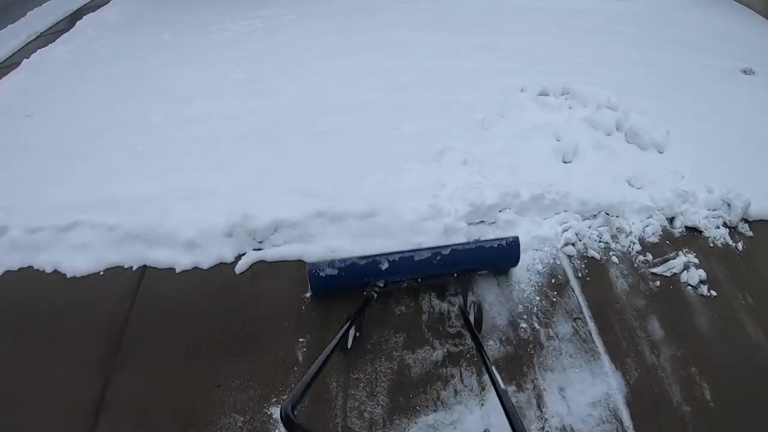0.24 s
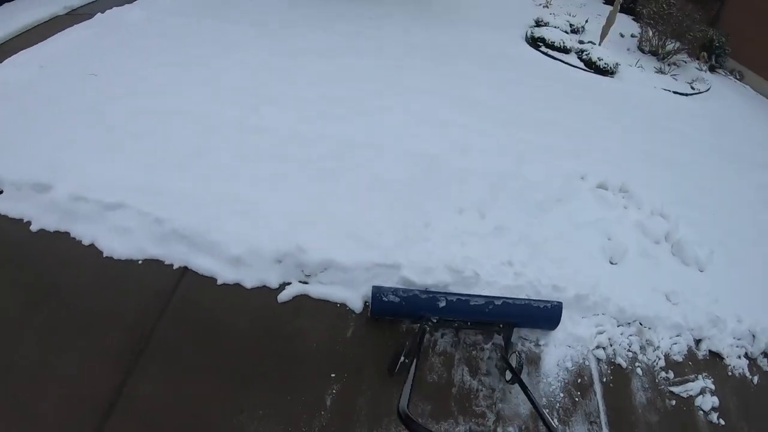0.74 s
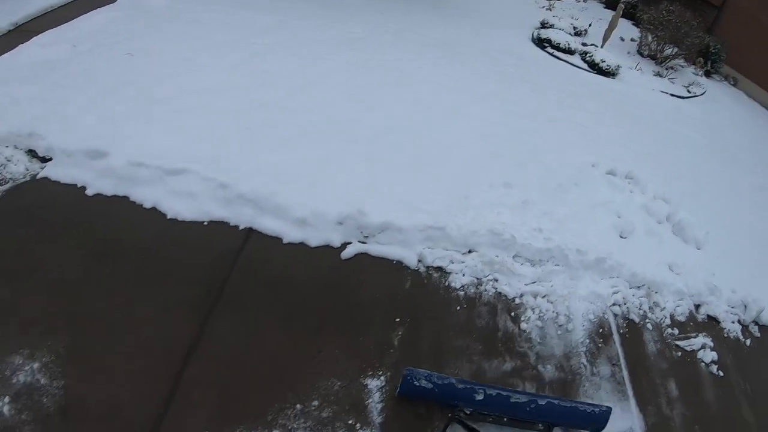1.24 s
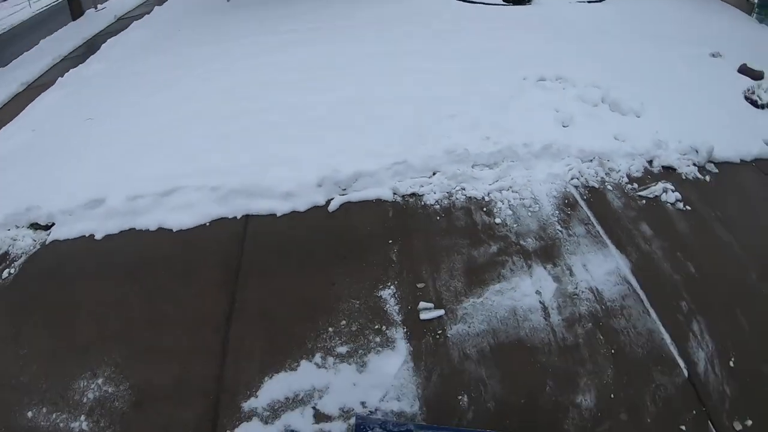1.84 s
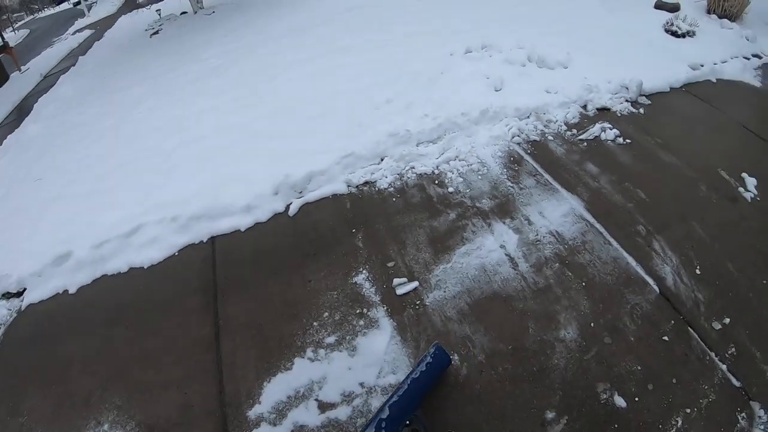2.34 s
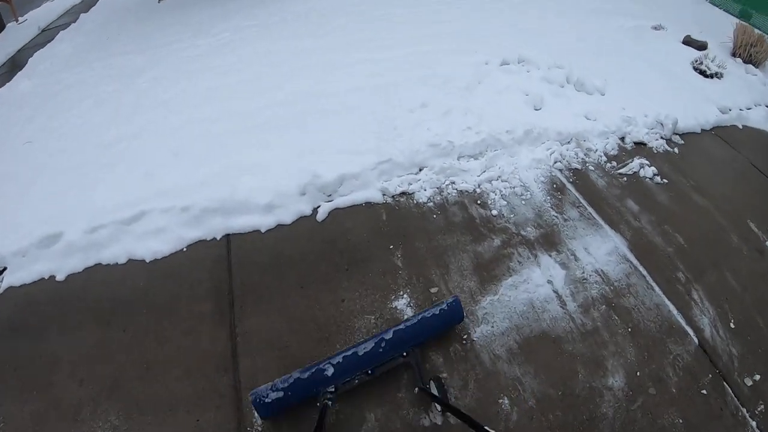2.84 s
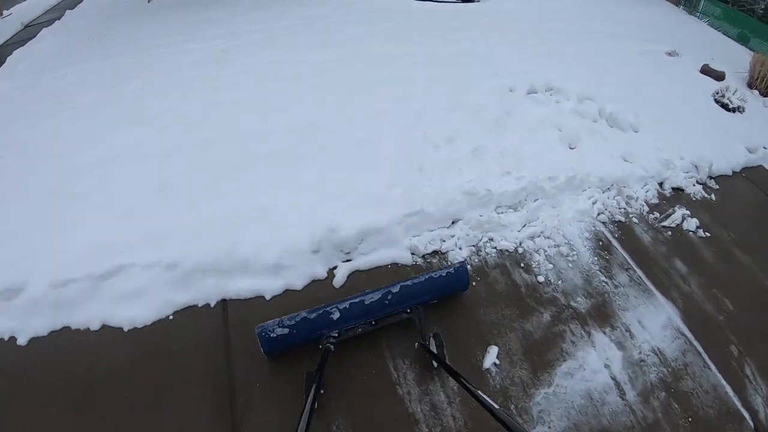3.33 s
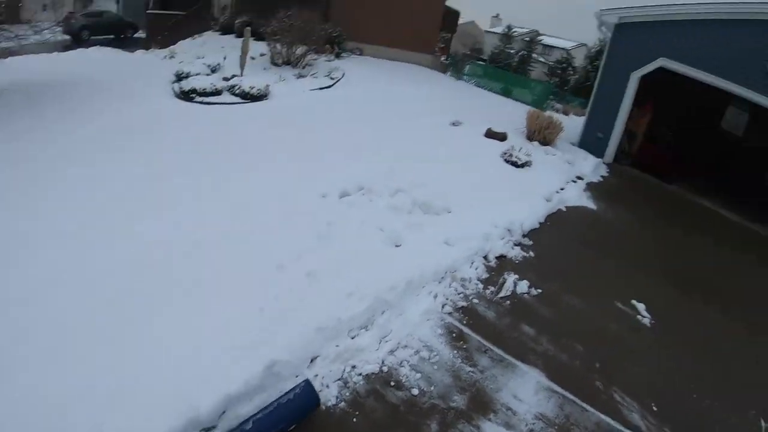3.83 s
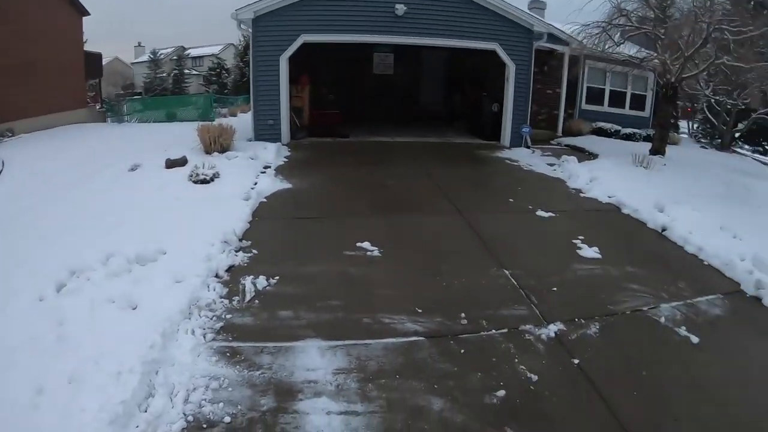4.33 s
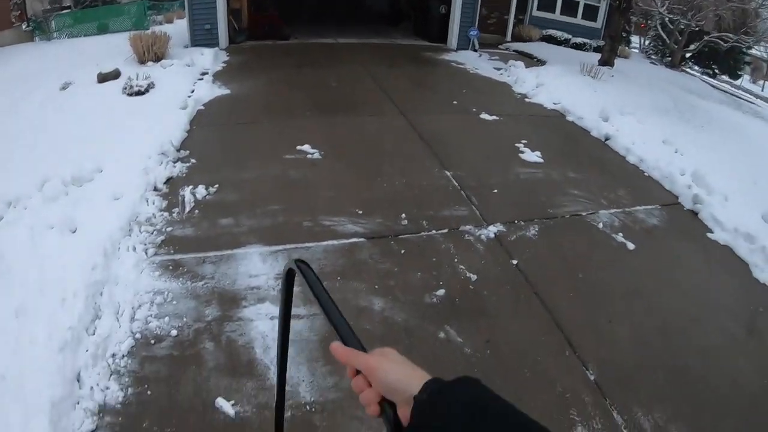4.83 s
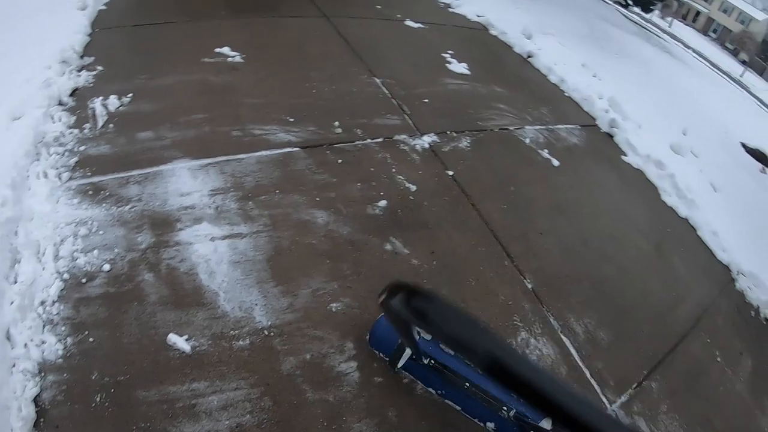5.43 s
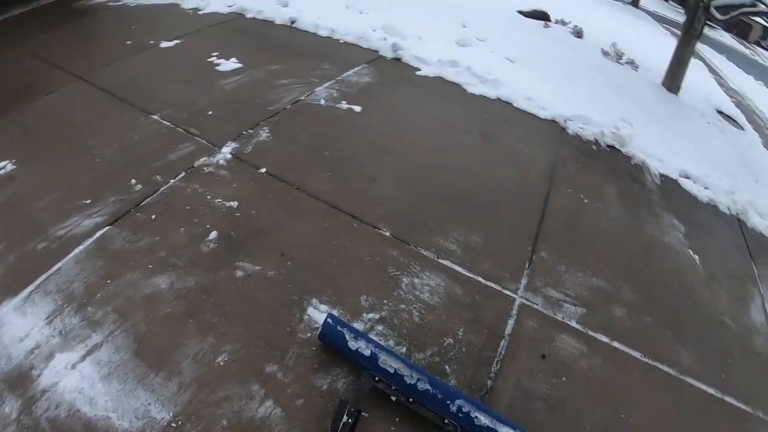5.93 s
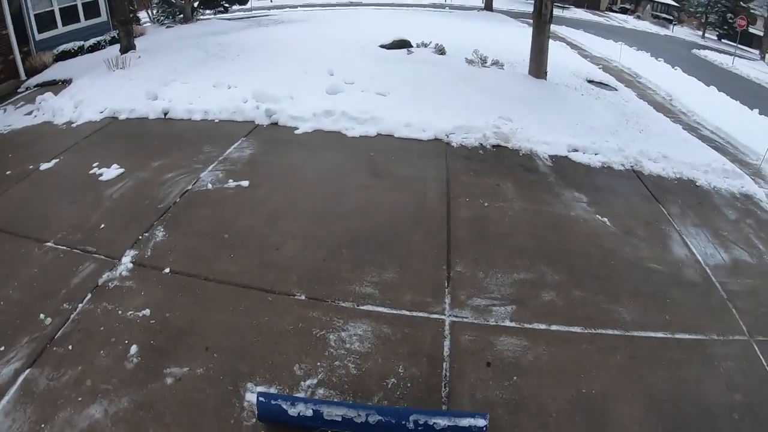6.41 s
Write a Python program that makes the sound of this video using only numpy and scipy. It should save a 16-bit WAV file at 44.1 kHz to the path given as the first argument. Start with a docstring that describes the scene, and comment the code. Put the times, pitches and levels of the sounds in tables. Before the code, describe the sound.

A plastic snow pusher works on a concrete driveway, heard in stereo from the worker's head, mostly right of centre. From 0 to 0.45 s a harsh, juddering rasp pushes forward, ending in hollow knocks and dry snaps. From 0.5 to 1.65 s the blade skips in short gritty skids with ticks and soft bumps. A long stroke starts faintly near 1.7 s, grows at 2.2 and runs as a sandy, hissing scrape until 3.55 s, stopping in a crack and a flurry of snaps. Skids and a strong double knock at 4.0 s fade into light scraping; small rough squeaks stutter from 4.8 to 5.2 s. A faint scuff at 5.6, hard knocks with slight steel clinks at 5.8-6.0, then a quiet skim with a brief hollow tone at 6.35 swells into a rasp to the end. Soft wind and quiet steady outdoor air lie beneath.

```python
"""Snow pusher on a concrete driveway

A plastic blade on a steel frame is shoved and dragged over concrete, heard in stereo from the worker's head.
Grit noise makes the rasp and hiss, random stick-slip shakes the blade's modes, and narrow noise makes it squeak.
Knocks, ticks and soft bumps ring the plastic; steel fittings clink, and house fronts return a faint tail.
Light wind noise touches the microphone over a quiet, steady outdoor background."""
import sys
import numpy as np
from scipy import signal
from scipy.fft import rfft, irfft
from scipy.io import wavfile

SR = 44100
rng = np.random.default_rng(int(sys.argv[2]) if len(sys.argv) > 2 else 0)


def unload_wav(signal):
    """Save mono or channel-first audio to the path in sys.argv[1] as 16-bit WAV at rate SR, clipped to [-1, 1]."""
    wavfile.write(
        sys.argv[1],
        SR,
        np.round(np.clip(np.atleast_2d(signal).T, -1, 1) * 32767).astype(np.int16),
    )


N = 294147

# The four long strokes of the edge, each: (time [s], rasp [dB], judder [dB], fine hiss [dB])
FIRST_PUSH = [(0.0, -23, -21, -30), (0.024, -37.5, -44, -34), (0.032, -28.5, -32.5, -29.5),
              (0.162, -31, -34, -29.5), (0.316, -27, -27, -24.5), (0.455, -27, -22.5, -27.5)]
LONG_STROKE = [(1.67, -39, -39, -39), (1.792, -37.5, -38.5, -42.5), (2.228, -27.5, -42, -31.5),
               (2.35, -32, -42.5, -31.5), (2.754, -30, -35, -29), (3.158, -32, -38.5, -30),
               (3.555, -29, -27, -27), (3.58, -45, -28, -35)]
TURN = [(4.45, -45, -50, -58), (4.522, -39, -42, -46), (4.668, -39.5, -40, -44), (4.762, -43, -46.5, -48),
        (4.924, -45, -57, -42.5), (5.204, -36.5, -38.5, -32), (5.275, -37, -38.5, -33)]
LAST_PUSH = [(6.08, -43.5, -56, -52), (6.212, -55, -72, -67), (6.388, -44, -45.5, -43.5),
             (6.67, -34, -37, -31)]
# Share of fine sizzle as the lightly loaded edge skims: (time [s], share [0-1])
SKIM = [(2.2, 0.06), (2.65, 0.3), (3.0, 0), (3.6, 0.03), (4.1, 1), (6.1, 0.74), (6.67, 0.18)]
# Broad ring of the edge, moving with its speed and angle: (time [s], centre [Hz])
EDGE_RING = [(0.1, 3500), (0.39, 3093), (2.03, 2200), (2.27, 2503), (2.4, 4990), (2.7, 6070), (2.92, 2608),
             (3.3, 4077), (3.56, 3300), (6.4, 5300)]
# Colours of the scrape, each: (frequency [Hz], relative level [dB per Hz])
RASP_COLOUR = [(300, -24), (650, 9), (850, -3.5), (1050, 4.5), (1350, 5.5), (1800, 3.5), (2400, 5.5),
               (3300, 0.5), (4300, -11), (9000, -50)]
HISS_COLOUR = [(2000, -12), (3500, 6.5), (4500, 5.5), (5600, 3), (7600, -5.5), (8800, -7), (9600, -14),
               (10600, -22.5), (11900, -23.5), (14000, -30), (15500, -71)]
SIZZLE_COLOUR = [(2500, 8), (4500, 13.5), (7500, 11.5), (8900, 4.5), (9700, -6.5), (10700, -34),
                 (12000, -11), (15500, -46)]
COARSE_COLOUR = [(400, -6.5), (1000, -2), (1500, 1.5), (2700, -7), (3600, -7.5), (5500, -10.5), (8000, -23),
                 (11000, -38)]
# A loaded edge runs more evenly, so its friction spreads less
PUSH_SPREAD_DB, TURN_SPREAD_DB, SKID_SPREAD_DB = 1.23, 1.5, 2.5
TURN_LIFT_QUICKNESS = 1.9   # the blade is lifted clear: its release is this many times faster
COARSE_DB, EDGE_RING_DB = -15, -5


def scrape(catch_rate_hz=62):
    """One uneven friction drives rasp, hiss, judder, coarse crunch and the ring of the edge."""
    grip = np.minimum(drift(catch_rate_hz), 1)   # the edge slips before it can grip harder

    def friction_power(spread_db):
        return from_db(spread_db * grip - spread_db ** 2 / 10) ** 2

    pushes = stroke(FIRST_PUSH) + stroke(LONG_STROKE) + stroke(LAST_PUSH)
    pushes = pushes * friction_power(PUSH_SPREAD_DB)
    turn = stroke(TURN, TURN_LIFT_QUICKNESS) * friction_power(TURN_SPREAD_DB)
    skidding = skids() * friction_power(SKID_SPREAD_DB)
    rasp_gain, judder_gain, hiss_gain = np.sqrt(pushes + turn + skidding)

    rasp = rasp_gain * grit(RASP_COLOUR, per_s=6000, size_db=0.0)
    skim = np.clip(in_time(SKIM)[0], 0, 1)
    hiss = np.sqrt(1 - skim) * grit(HISS_COLOUR, per_s=12000, size_db=0.5)
    sizzle = np.sqrt(skim) * grit(SIZZLE_COLOUR, per_s=12000, size_db=3.0)
    fine = hiss_gain * (hiss + sizzle)
    edge_noise = resonance(in_time(EDGE_RING)[0], width_hz=1500)
    edge = from_db(EDGE_RING_DB) * np.sqrt(pushes[2]) * edge_noise

    # coarse grains crunch most in the skids
    coarse_gain = from_db(COARSE_DB) * np.sqrt(skidding[0] + .5 * pushes[0])
    coarse = coarse_gain * grit(COARSE_COLOUR, per_s=450, size_db=2.0)
    body = judder_gain * soften(judder(slips_per_s=1100, size_db=2.0), corner_hz=3020)
    return ground_bounce(rasp + fine + edge) + coarse + body + hollow()


STROKE_RISE_S = 0.02


def stroke(curve, quickness=1):
    """Power of rasp, judder and hiss in a long stroke, following the worker's effort."""
    start_s, end_s = curve[0][0] - STROKE_RISE_S, curve[-1][0]
    touch = contact(start_s, STROKE_RISE_S, end_s - start_s, 0, quickness)
    return (from_db(in_time(curve)) * touch) ** 2


# Brief skips and skids of the blade:
# (start time [s], rise [s], length [s], rasp level [dB], judder level [dB], hiss level [dB])
SKIDS = [(0.469, 0.014, 0.081, -36.5, -28, -47), (0.565, 0.009, 0.25, -47, -37, -68),
         (0.807, 0.091, 0.087, -29.5, -29, -33.5), (0.891, 0.015, 0.087, -43.5, -54, -40.5),
         (0.989, 0.023, 0.058, -39, -31.5, -36.5), (1.048, 0.054, 0.092, -29.5, -30, -31),
         (1.183, 0.017, 0.097, -32, -30.5, -33), (1.3, 0.0046, 0.058, -31, -31.5, -34),
         (1.407, 0.0068, 0.037, -32, -28, -36.5), (1.476, 0.024, 0.022, -28.5, -29.5, -30.5),
         (1.525, 0.0068, 0.082, -30, -30.5, -35), (1.623, 0.0039, 0.033, -31.5, -32.5, -36),
         (3.582, 0.017, 0.018, -27.5, -27, -31), (3.623, 0.01, 0.23, -40.5, -32.5, -47),
         (3.789, 0.011, 0.023, -27, -28, -31), (3.827, 0.011, 0.055, -34, -29, -32.5),
         (3.881, 0.043, 0.097, -33.5, -38.5, -38.5), (4.002, 0.028, 0.09, -31.5, -34, -35),
         (4.11, 0.019, 0.53, -36.5, -36, -43), (5.82, 0.022, 0.11, -24.5, -23, -28),
         (5.937, 0.01, 0.11, -32, -31, -35)]
SKID_SAG_DB_PER_S = 42   # a skid loses speed as it goes


def skids():
    """Power of rasp, judder and hiss in the short skids: each bites, slows and lifts off."""
    power = 0
    for start_s, rise_s, length_s, *levels_db in SKIDS:
        touch = contact(start_s, rise_s, length_s, SKID_SAG_DB_PER_S)
        power = power + (from_db(levels_db)[:, None] * touch) ** 2
    return power


# the edge falls silent at once, the blade shakes on
EDGE_RELEASE_DB_PER_S, JUDDER_RELEASE_DB_PER_S = 524, 236


def contact(start_s, rise_s, length_s, sag_db_per_s, quickness=1):
    """Envelopes of rasp, judder and hiss for one touch of the edge on the ground."""
    edge, blade = [swell(start_s, rise_s, length_s, sag_db_per_s, quickness * release)
                   for release in (EDGE_RELEASE_DB_PER_S, JUDDER_RELEASE_DB_PER_S)]
    return np.array([edge, blade, edge])


# Low modes of the blade: (frequency [Hz], level [dB], nominal t60 [s])
BLADE_MODES = [(118.5, -24.5, 0.45), (143, -8.5, 0.089), (205, 1, 0.049), (291.4, -2.5, 0.066),
               (372, -3, 0.042), (480, -4, 0.044), (616, 0, 0.018), (827, -3.5, 0.015)]


def judder(slips_per_s, size_db):
    """The edge sticks and slips at random, shaking the blade's low modes; rms 1 in the middle."""
    slips = (rng.random(N) < slips_per_s / SR) * from_db(size_db * np.minimum(rng.exponential(1, N), 3))

    def shake():
        # the loaded blade rings for only 0.63 of the nominal time
        return rms_one(sum(from_db(db) * ring(slips * rng.standard_normal(N), hz, 0.63 * t60)
                           for hz, db, t60 in BLADE_MODES))

    return stereo(shake(), shake())


# The gap under the tilted blade sings: (start time [s], length [s], starting pitch [Hz], level [dB])
HOLLOW = [(6.331, 0.12, 809, -43.5)]
HOLLOW_SAG_HZ_PER_S, HOLLOW_RISE_S, HOLLOW_RELEASE_DB_PER_S = 220, 0.012, 309


def hollow(width_hz=60):
    """The gap under the tilted blade sings as narrow noise, its pitch falling as the angle changes."""
    t, pitch, level = np.arange(N) / SR, np.zeros(N), np.zeros(N)
    for start_s, length_s, hz, db in HOLLOW:
        pitch = np.where(t < start_s, pitch, hz - HOLLOW_SAG_HZ_PER_S * (t - start_s))
        level += from_db(db) * swell(start_s, HOLLOW_RISE_S, length_s, 0, HOLLOW_RELEASE_DB_PER_S)
    return level * resonance(pitch, width_hz)


# Bounce off the concrete as the blade tilts: (time [s], delay [ms], strength [0-1])
BOUNCE = [(3.5, 0.65, 0.16), (4.6, 0.78, 0), (4.9, 1.14, 0.4), (5.27, 1.06, 0.28), (6.67, 1.33, 0.13)]


def ground_bounce(x, wander_ms=0.248, scatter=0.16, count=3):
    """Reflections off the ground and the worker's body sweep combs through the scrape as things move."""
    delay_ms, strength = in_time(BOUNCE)
    n = np.arange(N)

    def late(ms):
        return np.array([np.interp(n - ms * SR / 1000, n, side) for side in x])

    body = sum(late(2.3 + 1.4 * k + wander_ms * drift(1.285)) for k in range(count))
    total = x + strength * late(delay_ms) + scatter * body
    return total / np.sqrt(1 + strength ** 2 + count * scatter ** 2)


# Blade strikes the ground:
# (time [s], crack level [dB], shell clatter level [dB], thump level [dB], sizzle level [dB])
KNOCKS = [(0.0329, -25.5, -52, -46, -31), (0.386, -23, -51, -22, -48), (0.44, -20.5, -43, -18, -41),
          (0.4827, -50, -49, -16.5, -30), (0.513, -29, -51, -36, -31.5), (0.58, -37, -62, -60, -36),
          (0.757, -28.5, -46.5, -21.5, -32), (1.012, -29.5, -54, -43, -31.5), (1.196, -30, -53, -34, -38),
          (1.4742, -26, -46, -39, -31.5), (3.465, -29, -50, -18.5, -34.5), (3.563, -20.5, -48, -42, -29),
          (3.622, -33, -64, -53, -31.5), (3.843, -22, -41.5, -31, -37), (3.9984, -25, -39.5, -22.5, -22.5),
          (4.0163, -18.5, -38, -20.5, -21.5), (4.098, -26.5, -42.5, -25, -30.5),
          (5.817, -18, -39, -18, -24), (5.864, -22.5, -42, -14.5, -35), (5.8848, -35, -44.5, -23.5, -25),
          (6, -21.5, -43, -35, -24.5)]


def knocks():
    """A blow thumps the blade; its edge chatters on the concrete, ringing the shell's middle modes."""
    s, crack_db, clatter_db, thump_db, sizzle_db = np.transpose(KNOCKS)
    crack = bursts(s, crack_db, t60=0.092) * grit(RASP_COLOUR, per_s=5000, size_db=4.0)
    sizzle = bursts(s, sizzle_db, t60=0.098) * grit(SIZZLE_COLOUR, per_s=20000, size_db=10.5)
    clatter = rung(bursts(s, clatter_db, t60=0.075), BLADE_MODES[3:] + SHELL_MODES[:1])

    thump = soften(strike(s, thump_db, BLADE_MODES, scatter_db=0.5), corner_hz=3500)
    wobble = soften(rung(bursts(s, thump_db - 21.5, t60=0.059), BLADE_MODES), corner_hz=203)
    low = high_pass(thump + wobble, 70)   # an open shell radiates no deep bass
    return plastic(crack + sizzle) + clatter + low


def plastic(x, t60=0.01, ring_db=-0.5):
    """The shell's many close modes ring on briefly after every grain, as a short noise tail."""
    age = np.arange(SR // 16) / SR
    tail = rng.standard_normal(len(age)) * np.exp(-np.log(1000) * age / t60) * (age > .002)
    response = from_db(ring_db) * tail / np.linalg.norm(tail) + (age == 0)
    return signal.oaconvolve(x, response[None] / np.linalg.norm(response), axes=1)[:, :N]


# The blade catches and snaps free: (time [s], snap level [dB], shell ring level [dB])
TICKS = [(0.494, -21, -28), (0.558, -23, -27), (0.5935, -19, -27), (0.6515, -33, -35), (0.6724, -38, -35),
         (0.748, -19, -27.5), (1.177, -21, -30), (1.398, -27, -38), (3.5725, -18, -20), (3.605, -19, -28),
         (3.6617, -23, -27), (3.6869, -19, -27), (3.714, -31, -33), (3.7272, -23, -40), (3.749, -30, -32.5),
         (4.193, -24.5, -48), (4.369, -23, -33), (5.942, -20, -25), (5.961, -18.5, -28)]
# Modes of the plastic shell: (frequency [Hz], level [dB], t60 [s])
SHELL_MODES = [(1240, -7, 0.022), (2310, 0.5, 0.016), (3170, -12, 0.028), (3430, -2.5, 0.033)]
# Colour of a light touch of dry plastic: (frequency [Hz], relative level [dB per Hz])
DRY_PLASTIC = [(500, -12.5), (1500, 4), (2700, 4), (5500, -9), (8000, -10), (11000, -34)]


def ticks():
    """Each release is a dry snap that rings the plastic shell and nudges the whole blade."""
    s, snap_db, ring_db = np.transpose(TICKS)
    snap_envelope = bursts(s, snap_db, t60=0.014, attack_s=0.00081)
    snap = snap_envelope * grit(DRY_PLASTIC, per_s=25000, size_db=1.5)
    shell = strike(s, ring_db, SHELL_MODES, scatter_db=6.0)
    nudge = strike(s, snap_db - 14.0, BLADE_MODES, scatter_db=5.0)
    return snap + shell + nudge


# Soft, dull bumps of the blade, some under its ticks: (time [s], level [dB])
BUMPS = [(0.536, -30), (0.595, -23.5), (1.022, -31), (1.235, -27), (1.398, -37), (1.452, -29), (1.499, -29),
         (1.648, -26.5)]


def bumps(lowest_hz=200):
    """Soft, dull bumps ring the blade's modes with the top and the bass taken off."""
    s, db = np.transpose(BUMPS)
    bump = soften(strike(s, db, BLADE_MODES, scatter_db=3.5), corner_hz=895)
    return high_pass(bump, lowest_hz)


# The skimming edge stutters in short squeaks: (time [s], level [dB])
SQUEAKS = [(4.775, -39), (4.9, -36.5), (4.961, -44), (4.987, -44), (5.02, -45), (5.111, -44), (5.21, -32)]
# Partials of the squeaks:
# (pitch at the first squeak [Hz], fall [Hz per s], level [dB], strongest time [s], spread [s])
SQUEAK_PARTIALS = [(1230, 200, 1, 5.0, 0.45), (2220, 750, 0, 4.95, 0.11), (3600, 1100, -4, 5.03, 0.11)]
SQUEAK_WIDTH_S, SQUEAL_RELEASE_DB_PER_S = 0.0051, 309


def squeaks(width_hz=150, held_db=-45.5, rise_s=0.082):
    """A rough squeal grabs again and again; its partials sink and take turns as the blade swings."""
    t, partials = np.arange(N) / SR, 0
    first_s, last_s = SQUEAKS[0][0], SQUEAKS[-1][0]

    def bell(centre_s, width_s):
        return np.exp(-np.minimum(((t - centre_s) / width_s) ** 2, 20))

    grabs = sum(from_db(db) * bell(s, SQUEAK_WIDTH_S) for s, db in SQUEAKS)
    held = from_db(held_db) * swell(first_s, rise_s, last_s - first_s, 0, SQUEAL_RELEASE_DB_PER_S)
    for hz, fall_hz_per_s, db, best_s, spread_s in SQUEAK_PARTIALS:
        tone = resonance(hz - fall_hz_per_s * (t - first_s), width_hz)
        partials = partials + from_db(db) * bell(best_s, spread_s) * tone
    return (grabs + held) * partials


# The frame's steel fittings clink: (time [s], lower ring level [dB], upper ring level [dB])
CLINKS = [(3.622, -52, -85), (4.018, -46, -60), (4.4015, -54, -50), (5.832, -48.5, -50.5),
          (5.997, -50.5, -51)]
# Modes of the steel: (frequency [Hz], level [dB], t60 [s])
STEEL_MODES = [(6620, -6, .14), (6760, -9, .22), (8230, -1, 0.06), (8770, 2, 0.045), (9055, -2, .055)]


def clinks(lower_count=2):
    """Loose steel fittings rattle high and briefly, and the frame hums on after every knock."""
    s, lower_db, upper_db = np.transpose(CLINKS)
    knock_s, *_, sizzle_db = np.transpose(KNOCKS)
    hum = bursts(knock_s, sizzle_db - 39.5, t60=0.19)
    lower = rung(bursts(s, lower_db, t60=0.016) + hum, STEEL_MODES[:lower_count])
    upper = rung(bursts(s, upper_db, t60=0.016) + hum, STEEL_MODES[lower_count:])
    return lower + upper


SCUFF_START_S, SCUFF_RISE_S, SCUFF_LENGTH_S = 5.606, 0.024, 0.11
SCUFF_DB, SCUFF_SAG_DB_PER_S = -35, 90


def scuff():
    """A short, light scuff of a boot on the concrete."""
    envelope = swell(SCUFF_START_S, SCUFF_RISE_S, SCUFF_LENGTH_S, SCUFF_SAG_DB_PER_S, EDGE_RELEASE_DB_PER_S)
    return from_db(SCUFF_DB) * envelope * grit(DRY_PLASTIC, per_s=8000, size_db=-4.0)


# How far right of the head the blade is: (time [s], left minus right level [dB])
PLACE = [(0.63, -1), (1.74, -8.5), (2.99, -1.5), (3.92, -1.5), (4.36, -5.5), (6.67, -4)]


def head_shadow(x, corner_hz=320):
    """The far side is shaded above the bass, which bends round the head."""
    pan_db, = in_time(PLACE)
    bass = low_pass(x, corner_hz, order=1)
    return bass + (x - bass) * from_db(np.array([pan_db, -pan_db]) / 2)


def driveway(x, t60=1.0, echo_db=-30.5):
    """House fronts scatter back a faint, dull tail, made of decaying noise."""
    age = np.arange(SR // 2) / SR
    tail = rng.standard_normal((2, len(age))) * np.exp(-np.log(1000) * age / t60) * (age > .008)
    tail = low_pass(tail, 3500, order=1)
    tail /= np.sqrt(np.sum(tail ** 2) / 2)
    return x + from_db(echo_db) * signal.oaconvolve(x, tail, axes=1)[:, :N]


# Gusts on the microphone: (start time [s], length [s], relative level [dB])
GUSTS = [(-0.2, 0.5, -29.5), (2.457, 1.16, -29), (4.943, 0.34, -36), (6.47, 0.29, -35.5)]
# Colour of the wind on the microphone: (frequency [Hz], relative level [dB per Hz])
WIND_COLOUR = [(15, 4), (35, -12), (65, 7), (110, 0), (170, -4.5), (300, -15), (800, -54.5)]
GUST_RISE_S, GUST_SAG_DB_PER_S, GUST_RELEASE_DB_PER_S = 0.27, 9.5, 78


def wind(shared=0.44, left_db=2.0):
    """Eddies push on the left and right microphone as low noise, partly together."""
    gusts = 0
    for start_s, length_s, db in GUSTS:
        gust = swell(start_s, GUST_RISE_S, length_s, GUST_SAG_DB_PER_S, GUST_RELEASE_DB_PER_S)
        gusts = gusts + from_db(db) * gust
    left, right, both = [rms_one(colour(rng.standard_normal(N), WIND_COLOUR)) for _ in range(3)]
    return gusts * (np.array([left, right]) + shared * both) * from_db([[left_db], [-left_db]])


# Colour of the outdoor background: (frequency [Hz], relative level [dB per Hz])
OUTDOORS_COLOUR = [(15, -38), (25, -3.5), (150, -6.5), (286, -11.5), (1760, -16.5), (4260, -28),
                   (6900, -31.5), (7680, -25.5), (15000, -71)]
OUTDOORS_DB = -46.5


def outdoors():
    """A quiet, steady background of smooth stereo noise."""
    mid, side = [rms_one(colour(rng.standard_normal(N), OUTDOORS_COLOUR)) for _ in range(2)]
    return from_db(OUTDOORS_DB) * stereo(mid, side)


# Left-right tone balance: (frequency [Hz], left minus right level [dB])
TONE_BALANCE = [(100, -1.5), (380, 1.5), (750, -2), (1600, -2), (2600, 0.5), (5300, 2.1), (8000, -1.5),
                (9400, 1), (11500, 1.5)]


def tone_balance(x):
    """Tilts left and right tone, half either way."""
    return np.array([colour(channel, [(hz, sign * db / 2) for hz, db in TONE_BALANCE])
                     for channel, sign in zip(x, (1, -1))])


# How much the two sides differ: (frequency [Hz], side minus mid level [dB])
WIDTH = [(30, -11), (70, -15), (280, -54), (550, -16), (1000, -7.5), (2000, -11.5), (3500, -54), (5500, -9),
         (8000, 0.5)]


def stereo(mid, side):
    """The two sides agree in the low mids and part in the treble."""
    return mid + colour(side, WIDTH) * np.array([[1], [-1]])


def grit(spectrum, per_s, size_db):
    """Sand grains of uneven size snap under the edge; rms 1 in the middle."""
    grains = (rng.random(N) < per_s / SR) * from_db(size_db * np.minimum(rng.exponential(1, N), 4))
    mid, side = [rms_one(colour(grains * rng.standard_normal(N), spectrum)) for _ in range(2)]
    return stereo(mid, side)


FLEX_DETUNE = 0.04   # spread of the pitch shift, as a fraction


def strike(times, levels_db, modes, scatter_db):
    """Each blow rings every mode with its own strength, at a pitch that shifts as the plastic is bent."""
    hz, db, t60 = np.transpose(modes)[:, :, None]
    age, out = np.arange(SR // 4) / SR, np.zeros(N + SR)
    signs = (-1) ** np.arange(len(modes))[:, None]
    dying = signs * np.exp(-np.log(1000) * age / t60)
    for s, level_db in zip(times, levels_db):
        strength, bend = rng.standard_normal((2, len(modes), 1))
        bent_hz = hz * (1 + FLEX_DETUNE * bend)
        rings = from_db(level_db + db + scatter_db * strength) * dying * np.sin(2 * np.pi * bent_hz * age)
        first = int(round(s * SR))
        out[first:first + len(age)] += rings.sum(axis=0)
    return out[:N]


def rung(envelope, modes):
    """A rough burst of tiny contacts rings a set of modes."""
    slips = envelope * rng.standard_normal((2, N))
    mid, side = sum(from_db(db) * ring(slips, hz, t60) for hz, db, t60 in modes)
    return stereo(mid, side)


def ring(clicks, hz, t60):
    """A unit click sets a decaying sine of height 1 ringing."""
    r, w = np.exp(-np.log(1000) / (t60 * SR)), 2 * np.pi * hz / SR
    return signal.lfilter([0, np.sin(w)], [1, -2 * r * np.cos(w), r * r], clicks + 1e-18)


def resonance(hz, width_hz):
    """Friction rings a resonance, as narrow noise centred on a pitch curve; rms 1."""
    real, imaginary = low_pass(rng.standard_normal((2, N)), width_hz / 2)
    phase = 2 * np.pi * np.cumsum(hz) / SR
    return rms_one(real * np.cos(phase) + imaginary * np.sin(phase))


def soften(x, corner_hz):
    """Snow cushions a contact and takes its top off."""
    return low_pass(x, min(corner_hz, SR / 3))


def bursts(times, levels_db, t60, attack_s=0.00076):
    """Envelope of sudden starts that die away, overlaps adding in power."""
    starts = np.zeros(N)
    starts[np.round(times * SR).astype(int)] = from_db(levels_db) ** 2
    power_decay = np.exp(-2 * np.log(1000) / (t60 * SR))
    dying = np.sqrt(signal.lfilter([1], [1, -power_decay], starts + 1e-18))
    r = np.exp(-1 / (attack_s * SR))
    return signal.lfilter([1 - r], [1, -r], dying)


def swell(start_s, rise_s, length_s, sag_db_per_s, release_db_per_s):
    """Envelope that rises towards 1, sags while it is held and dies away after its length."""
    first = int(np.clip(start_s * SR, 0, N - 1))
    age, rise_s = np.arange(first, N) / SR - start_s, max(rise_s, .001)
    sag_db = sag_db_per_s * np.maximum(age - rise_s, 0)
    lost_db = sag_db + release_db_per_s * np.maximum(age - length_s, 0)
    heard = lost_db < 100
    out = np.zeros(N)
    out[first:][heard] = np.clip(age[heard] / rise_s, 0, 1) * from_db(-lost_db[heard])
    return out


def drift(rate_hz):
    """Smooth random wander with spread 1."""
    r = np.exp(-2 * np.pi * rate_hz / SR)
    noise = rng.standard_normal(N + SR)   # the first second lets the filter settle
    return rms_one(signal.lfilter([1], [1, -2 * r, r * r], noise)[SR:])


def colour(x, spectrum, size=4096):
    """Causal (minimum-phase) filter with the given spectrum."""
    hz, db = np.transpose(spectrum)
    grid = np.maximum(np.arange(size // 2 + 1) * SR / size, 1)
    cepstrum = irfft(np.log(from_db(np.interp(np.log(grid), np.log(hz), db))))
    cepstrum[1:size // 2] *= 2   # fold the cepstrum onto positive times
    cepstrum[size // 2 + 1:] = 0
    return signal.oaconvolve(x, irfft(np.exp(rfft(cepstrum))))[:N]


def low_pass(x, corner_hz, order=2):
    """Butterworth filter that keeps what lies below the corner."""
    return signal.sosfilt(signal.butter(order, corner_hz, fs=SR, output="sos"), x)


def high_pass(x, corner_hz):
    """Second-order Butterworth filter that keeps what lies above the corner."""
    return signal.sosfilt(signal.butter(2, corner_hz, "high", fs=SR, output="sos"), x)


def in_time(rows):
    """Each column of a curve at every sample."""
    s, *columns = np.transpose(rows)
    return [np.interp(np.arange(N) / SR, s, column) for column in columns]


def from_db(db):
    """Amplitude of a level in dB."""
    return 10 ** (np.asarray(db) / 20)


def rms_one(x):
    """Scale a signal to rms 1."""
    return x / np.sqrt(np.mean(x ** 2) + 1e-20)


def scene():
    """The pusher stays on the right, now nearer the middle, now farther out; the background stays put."""
    blade = scrape() + knocks() + ticks() + bumps() + squeaks() + scuff()
    pusher = head_shadow(blade + clinks())
    return tone_balance(driveway(pusher) + wind() + outdoors())


def record(dry, cutoff_hz=15200):
    """The microphone's top is cut steeply by an elliptic low-pass."""
    return signal.sosfilt(signal.ellip(10, .2, 90, cutoff_hz, fs=SR, output="sos"), dry)


dry = scene()
out = record(dry)
unload_wav(out)
```